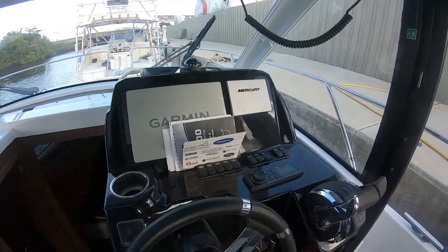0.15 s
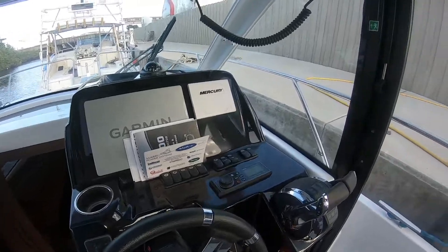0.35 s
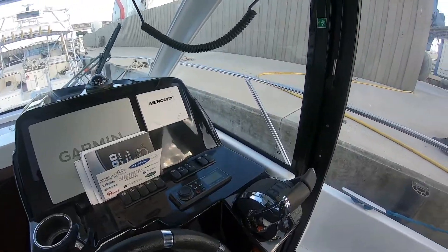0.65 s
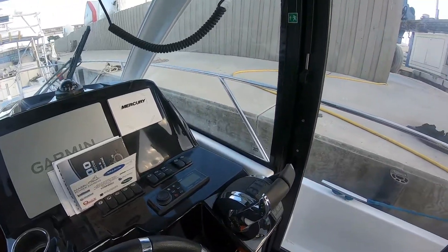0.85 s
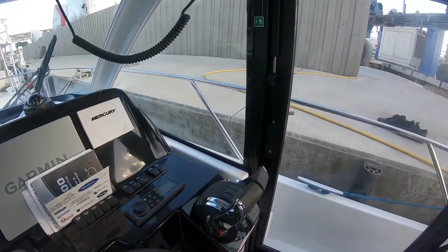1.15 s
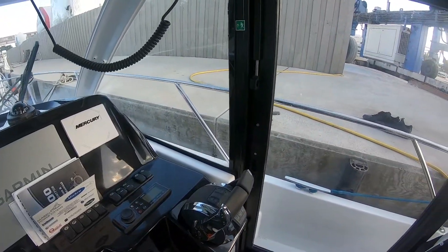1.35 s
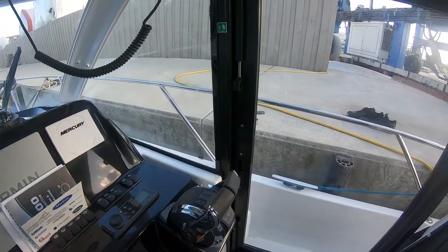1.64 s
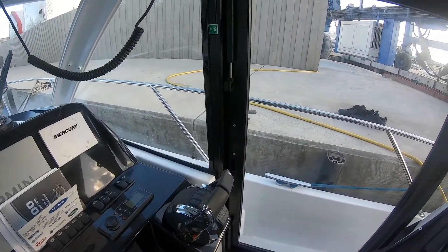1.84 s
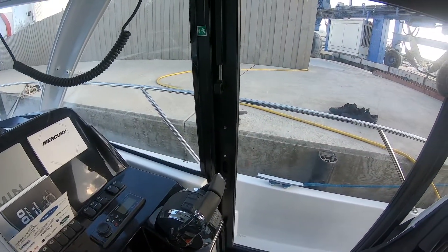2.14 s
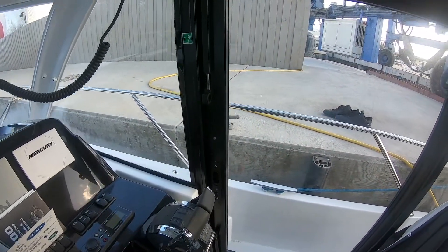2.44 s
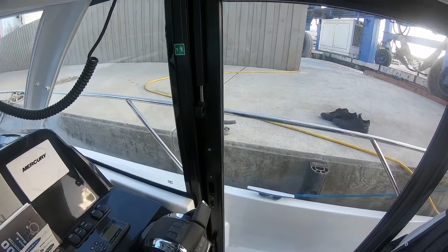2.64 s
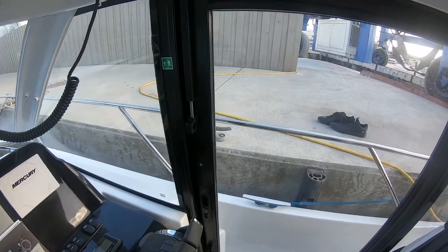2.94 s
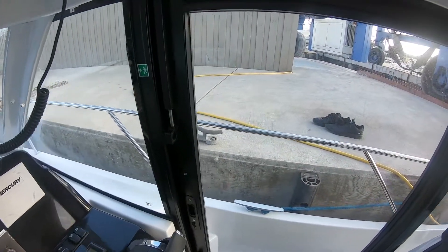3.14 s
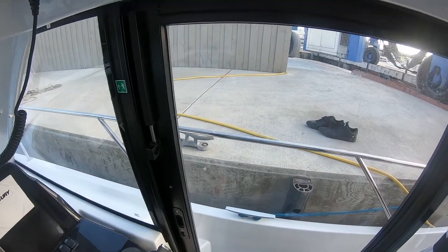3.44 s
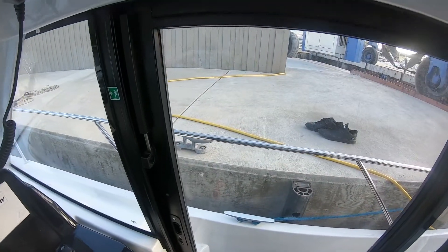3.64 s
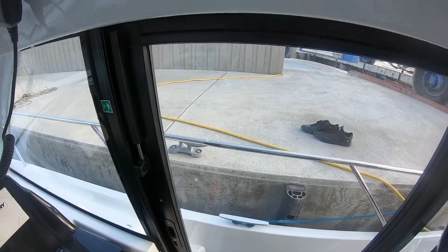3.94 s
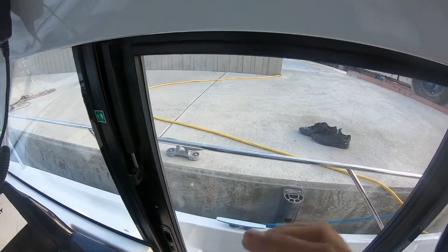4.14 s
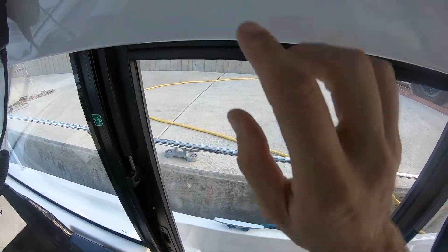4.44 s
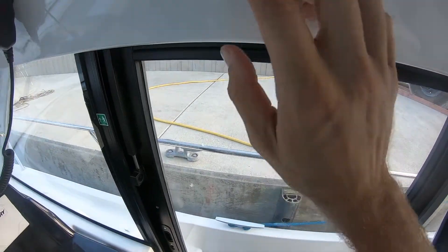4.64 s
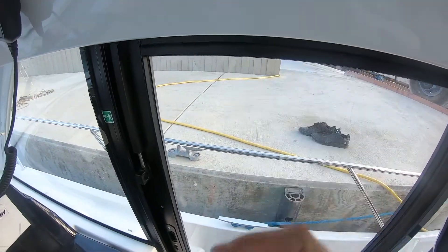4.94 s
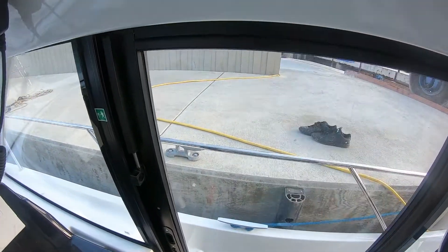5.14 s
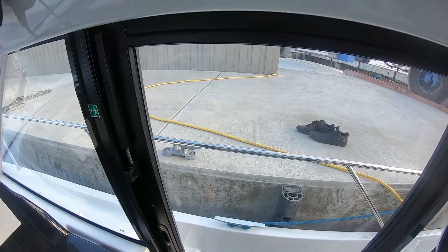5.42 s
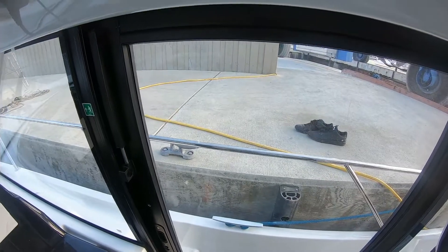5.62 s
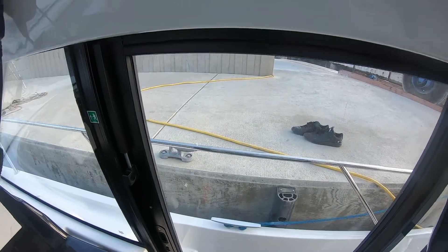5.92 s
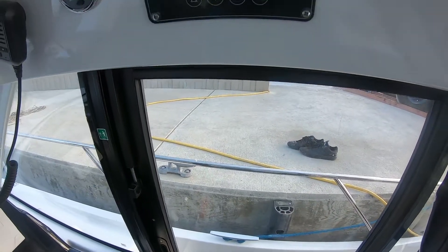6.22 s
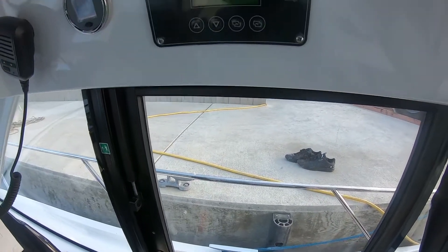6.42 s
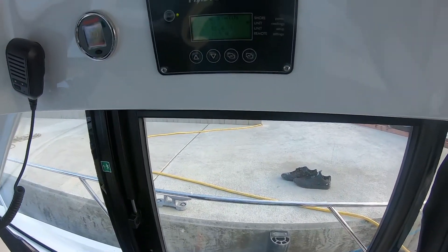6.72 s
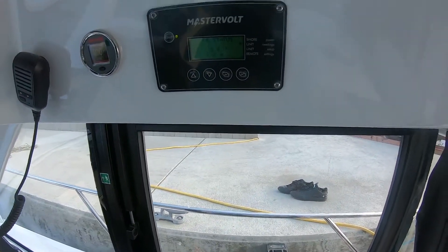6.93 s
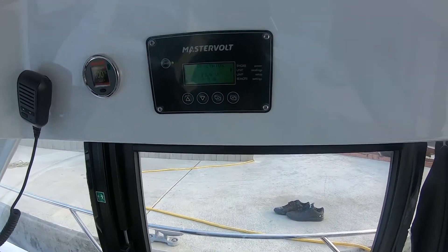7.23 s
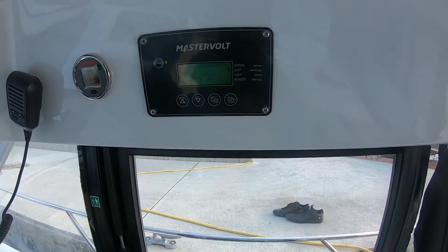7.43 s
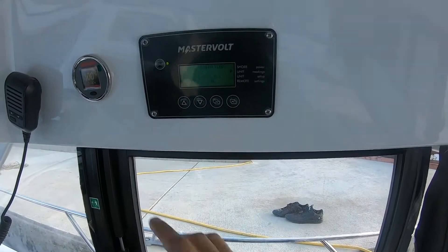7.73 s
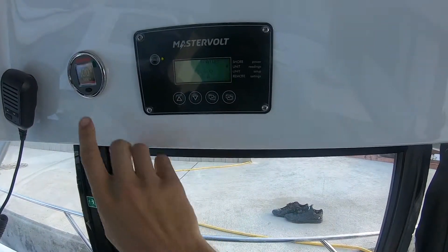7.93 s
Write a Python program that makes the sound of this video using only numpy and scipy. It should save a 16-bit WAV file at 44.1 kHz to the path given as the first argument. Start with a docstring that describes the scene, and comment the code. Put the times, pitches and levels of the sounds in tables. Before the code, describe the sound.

Air conditioners rumble and hiss steadily in a small boat cabin, with a faint compressor whine, soft hand brushes, a light knock and small plastic ticks.

```python
"""Small boat cabin, air conditioners running, one hand-held camera microphone starting close by the helm.
From the start: rumble from the ducts, hiss from the vents, blower hum, faint electrical tones, compressor whine.
The camera soon leaves the helm and the whine recedes; soft brushes of the hand, then a light knock on a panel.
It rounds to the side window and a small tick sounds; up at the ceiling the whine is strong again,
a second tick chatters and a higher pair of tones sings up twice. Noise, sines and decaying modes make it all."""
import sys
import numpy as np
from scipy import signal
from scipy.fft import rfft, irfft
from scipy.io import wavfile
from scipy.ndimage import map_coordinates

SR = 44100
rng = np.random.default_rng(int(sys.argv[2]) if len(sys.argv) > 2 else 0)


def int16_out(signal):
    """Quantize to a 16-bit WAV file."""
    q = np.round(np.clip(np.atleast_2d(signal).T, -1, 1) * 32767)
    wavfile.write(sys.argv[1], SR, q.astype(np.int16))


N = 355975
T = np.arange(N) / SR  # s

# the camera's moves (start/s, end/s): away from the helm, out into the cabin,
# round to the side window, up to the ceiling
LEAVE, STEP, TURN, LIFT = (0.35, 0.96), (2.17, 3), (2.6, 4.6), (5.9, 6.75)


def move(start, end):
    """A smooth hand movement: 0 before it starts, 1 once it is over."""
    progress = np.clip((T - start) / (end - start), 0, 1)
    return 0.5 - 0.5 * np.cos(np.pi * progress)


def bump(s, half):
    """A smooth rise and fall round a moment, 1 at its top."""
    return np.exp(-0.5 * ((T - s) / half) ** 2)


def undb(db):
    """Decibels to gain."""
    return 10 ** (np.asarray(db) / 20)


def unit(x):
    """Scale to rms 1."""
    return x / np.sqrt(np.mean(x ** 2))


def walk(rate):
    """Smooth random drift with spread 1, mostly slower than the rate in Hz."""
    bins = np.arange(N // 2 + 1) * SR / N
    return unit(irfft(rfft(rng.standard_normal(N)) / (1 + (bins / rate) ** 4), N))


def noise(colour):
    """Noise of rms 1 with a (f/Hz, level/dB) colour that falls steeply beyond its ends."""
    hz, db = np.transpose(colour)
    bins = np.arange(1, N // 2 + 2) * SR / N
    skirts = np.minimum(bins / hz[0], 1) ** 4 * np.minimum(hz[-1] / bins, 1) ** 4
    gain = undb(np.interp(np.log(bins), np.log(hz), db)) * skirts
    return unit(irfft(rfft(rng.standard_normal(N)) * gain, N))


def split(x, hz):
    """The parts of a sound below and above a frequency."""
    bins = np.arange(N // 2 + 1) * SR / N
    low = irfft(rfft(x) / (1 + (bins / hz) ** 8), N)
    return low, x - low


def tone(hz):
    """Sine of rms 1 on a moving pitch."""
    cycles = np.cumsum(hz) / SR + rng.random()
    return np.sqrt(2) * np.sin(2 * np.pi * cycles)


def steady_tones(lines, wander_hz, waver_db):
    """Machine tones that waver as the microphone passes through their standing waves."""
    total = 0
    for hz, db in lines:
        wandering = tone(hz + wander_hz * walk(rate=3.2))
        total = total + wandering * undb(db + waver_db * walk(rate=2.3))
    return total


def ring(modes, t):
    """Struck modes (f/Hz, level/dB, t60/s), t seconds after the blow."""
    return sum(undb(db - 60 * t / t60) * np.sin(2 * np.pi * hz * t) for hz, db, t60 in modes)


CABIN_T60_S, CABIN_WET_DB = 0.15, -12.5


def cabin(x, t60, wet_db, count=5):
    """Short wall reflections; their pattern changes from place to place along the camera's path."""
    t = T[:SR // 5]
    out = x
    for place in range(count):
        # the first reflection comes after 4 ms
        response = rng.standard_normal(len(t)) * undb(-60 * t / t60) * (t > 0.004)
        echoes = signal.fftconvolve(x, response / np.linalg.norm(response))[:N]
        nearness = np.maximum(1 - np.abs(np.linspace(0, count - 1, N) - place), 0)
        out = out + undb(wet_db) * np.sqrt(nearness) * echoes
    return out / np.sqrt(1 + undb(wet_db) ** 2)


# turbulence in the ducts, relative colour (f/Hz, level/dB per Hz)
DUCT_COLOUR = [(15, -18), (23, -3), (32, 0), (48, -2.5), (80, 3), (100, 2), (130, 5.5), (152, -5),
               (172, -3), (215, -7), (238, -11), (285, -10), (355, -17.5), (382, -15), (440, -24),
               (500, -26), (565, -46)]
DUCT_SPLIT_HZ = 195
DEEP_DB, DEEP_LEAVE_DB, DEEP_STEP_DB, DEEP_LIFT_DB = -40, 2.2, 0.86, -1
FULL_DB, FULL_STEP_DB = -46.5, 3


def duct_rumble():
    """Turbulent air rumbles in the ducts: large eddies below, smaller ones above."""
    deep, full = split(noise(DUCT_COLOUR), DUCT_SPLIT_HZ)
    deep_db = DEEP_DB + DEEP_LEAVE_DB * move(*LEAVE) + DEEP_STEP_DB * move(*STEP) + DEEP_LIFT_DB * move(*LIFT)
    surge_db = 1.0 * walk(rate=13)  # large eddies make the deep rumble lumpy
    churn_db = 1.02 * walk(rate=9)  # smaller eddies stir its body
    body = unit(full) * undb(FULL_DB + FULL_STEP_DB * move(*STEP) + churn_db)
    return unit(deep) * undb(deep_db + surge_db) + body


# hollow note of the vent boxes, relative colour (f/Hz, level/dB per Hz)
VENT_COLOUR = [(480, -11), (565, -18), (640, -7), (680, -7), (725, -1.5), (780, -3.5), (835, 0.7),
               (900, -5.5), (950, -7), (995, -10), (1060, -12.5), (1120, -21.5), (1190, -10), (1300, -22)]
VENT_DB, VENT_TURN_DB, VENT_LIFT_DB = -57.5, 2, -1.5


def vent_boxes():
    """Air sounds the hollow vent boxes as noise peaked at their resonances."""
    return noise(VENT_COLOUR) * undb(VENT_DB + VENT_TURN_DB * move(*TURN) + VENT_LIFT_DB * move(*LIFT))


# the nearest panel mirrors the hiss: detour at the helm and what the moves add to it (m)
DETOUR_M, DETOUR_TURN_M, DETOUR_LIFT_M = 0.17, 0.059, -0.07
# strength of that reflection at the helm, and what the moves add to it (dB)
MIRROR_DB, MIRROR_TURN_DB, MIRROR_LIFT_DB = -22, 3, 1


def mirrored(x):
    """A close panel adds a slightly later copy; the comb it makes slides as the camera moves."""
    turn, lift = move(*TURN), move(*LIFT)
    detour_m = DETOUR_M + DETOUR_TURN_M * turn + DETOUR_LIFT_M * lift
    late_samples = detour_m / 343 * SR  # speed of sound in m/s
    strength = undb(MIRROR_DB + MIRROR_TURN_DB * turn + MIRROR_LIFT_DB * lift)
    return x + strength * map_coordinates(x, [np.arange(N) - late_samples], mode="mirror")


# air on the grille slats, relative colour (f/Hz, level/dB per Hz)
GRILLE_COLOUR = [(1190, -19), (1280, -1.5), (1750, 1), (2600, -0.1), (3200, 1.16), (3800, -4.5),
                 (4250, -3.5), (4700, -4.5), (5800, -6), (6300, -4), (6700, -6), (7200, -8), (7900, -7),
                 (8350, -12.5), (9200, -14.5), (9750, -24), (10400, -19.5), (12900, -21.5)]
# narrow band of extra hiss from the slats, relative colour (f/Hz, level/dB per Hz)
SLAT_COLOUR = [(3950, -10), (4250, -4), (4550, -19.5)]
HISS_DB, HISS_TURN_DB = -51, -0.6
SHARP_DB, SHARP_TURN_DB, SHARP_LIFT_DB = -55.5, -2, -0.6
SLAT_DB, SLAT_TURN_DB, SLAT_LIFT_DB = -63.5, -0.2, -5.5


def grille_hiss():
    """Air hisses on the grille slats; the upper hiss is beamed, so it changes most on the turn."""
    turn, lift = move(*TURN), move(*LIFT)
    soft, sharp = split(noise(GRILLE_COLOUR), hz=3870)
    soft_hiss = mirrored(unit(soft)) * undb(HISS_DB + HISS_TURN_DB * turn)
    sharp_hiss = unit(sharp) * undb(SHARP_DB + SHARP_TURN_DB * turn + SHARP_LIFT_DB * lift)
    slat_db = SLAT_DB + SLAT_TURN_DB * turn + SLAT_LIFT_DB * lift + 1.5 * walk(rate=4.3)
    slats = noise(SLAT_COLOUR) * undb(slat_db)
    flutter = undb(0.38 * walk(rate=16))
    return (soft_hiss + sharp_hiss + slats) * flutter


SHAFT_HZ = 35.9
# overtones of the shaft (multiple, level/dB, level added by the lift to the ceiling/dB)
SHAFT_OVERTONES = [(2, -48.5, 1.5), (3, -48.5, -1)]
# swells of the shaft note, the microphone in a belly of its standing wave (start t/s, end t/s, level/dB)
SHAFT_SWELLS = [(0, 1.55, -46), (1.7, 2.84, -37.5), (4.55, 7.63, -40.5)]
SWELL_FADE_S = 0.57


def blower():
    """The slightly unbalanced wheel shakes the cabin at shaft rate and its multiples."""
    def fade(s):
        return move(s - SWELL_FADE_S / 2, s + SWELL_FADE_S / 2)

    swell = sum(undb(db) * (fade(start) - fade(end)) for start, end, db in SHAFT_SWELLS)
    hz = SHAFT_HZ * (1 + 0.0035 * walk(rate=1.38))
    out = tone(hz) * swell
    for multiple, db, lift_db in SHAFT_OVERTONES:
        overtone_db = db + lift_db * move(*LIFT) + 2.0 * walk(rate=0.54)
        out = out + tone(multiple * hz) * undb(overtone_db)
    return out


# steady hum of motors, pump and panels (f/Hz, level at the helm/dB,
# level added by the step into the cabin/dB, level added by the lift to the ceiling/dB)
HUM_TONES = [(56.8, -53, 1.5, -2), (121.5, -53, -12.5, -10), (161.6, -54.5, 3, 5), (216.5, -55, 1, -3),
             (254, -70.5, 11.5, 5), (295.2, -68, 9.5, 4), (335.6, -65, -4, -5)]


def machine_hum():
    """Motors, pump and panels hum at fixed pitches, each rebalanced by the step and the lift."""
    step, lift = move(*STEP), move(*LIFT)
    lines = [(hz, db + step_db * step + lift_db * lift) for hz, db, step_db, lift_db in HUM_TONES]
    return steady_tones(lines, wander_hz=0.31, waver_db=2.5)


# thin electrical tones (f/Hz, level/dB)
ELECTRICAL_TONES = [(7000, -84), (13244, -82), (13530, -89.5), (13817, -83)]


def electrical_tones():
    """Electrical parts sing as faint, high, wavering sines."""
    return steady_tones(ELECTRICAL_TONES, wander_hz=1.4, waver_db=2.0)


# the compressor slows slightly under load
WHINE_HZ, WHINE_SAG_HZ_PER_S = 1348, 0.37
WHINE_DB, WHINE_LEAVE_DB, WHINE_TURN_DB, WHINE_LIFT_DB = -59.5, -8.5, -2.5, 11
# the whine dips briefly (t/s, level change/dB)
DIPS = [(.43, -4), (6.73, -6), (7.44, -1), (8.04, -3)]
WHINE_DIP_S = 0.031  # half-length
# a higher pair of tones sings up briefly (t/s, half-length/s, level/dB)
SING_SWELLS = [(7.134, .045, -58.5), (7.39, .05, -59.5)]
# that pair (f/Hz, relative level/dB)
SING_PAIR = [(1825, 0.5), (1898, -8)]


def compressor():
    """A whine trembling with the load, clearest at helm and ceiling, where higher tones join briefly."""
    hz = WHINE_HZ - WHINE_SAG_HZ_PER_S * T
    db = WHINE_DB + WHINE_LEAVE_DB * move(*LEAVE) + WHINE_TURN_DB * move(*TURN) + WHINE_LIFT_DB * move(*LIFT)
    db = db + sum(dip_db * bump(s, WHINE_DIP_S) for s, dip_db in DIPS)
    whine = tone(hz + 1.0 * walk(rate=3.9)) * undb(db + 0.68 * walk(rate=10))
    swell = sum(undb(top_db) * bump(s, half) for s, half, top_db in SING_SWELLS)
    return whine + steady_tones(SING_PAIR, wander_hz=2, waver_db=0.5) * swell


# brushes of the hand (t/s, half-length/s, level/dB, extra treble/dB)
HAND_BRUSHES = [(0.291, .06, -58.5, 7), (1.33, .12, -70, 12), (2.03, .09, -68, 11), (3.039, 0.005, -44, -1),
                (3.053, 0.009, -44.5, -1), (3.102, 0.057, -56.5, 1), (3.55, 0.33, -71, 16),
                (3.81, 0.054, -63, 7), (5.7, .06, -56, -12)]
# their relative colour (f/Hz, level/dB per Hz)
BRUSH_COLOUR = [(1200, -15), (1500, 5), (1800, 12.5), (2150, 1.5), (2800, 8.5), (4200, 1), (7500, -2),
                (10000, -11.5), (13000, -14), (16000, -22)]
BRUSH_SPLIT_HZ = 7500


def hand_brushes():
    """Skin brushes the camera, right at the microphone: grainy noise in short swishes."""
    grain = undb(1.7 * walk(rate=210))
    dull, bright = split(noise(BRUSH_COLOUR) * grain, BRUSH_SPLIT_HZ)
    swishes = 0
    for s, half, db, treble_db in HAND_BRUSHES:
        swishes = swishes + (dull + undb(treble_db) * bright) * undb(db) * bump(s, half)
    return swishes


# one soft knock on a hollow panel
KNOCK_S, KNOCK_DB = 3.2, -43
# the panel's modes (f/Hz, relative level/dB, t60/s)
PANEL_MODES = [(735, -1, 0.065), (850, -7, .04)]


def panel_knock():
    """A soft blow rings the hollow panel's decaying modes."""
    return undb(KNOCK_DB) * ring(PANEL_MODES, np.maximum(T - KNOCK_S, 0))


# small ticks and their rebounds (t/s, ring level/dB, snap level/dB, pitch ratio of the ring)
TICK_HITS = [(5.6122, -37.5, -46, 1), (5.6145, -47, -45.5, 1.4), (5.6195, -40, -60, 1),
             (5.6305, -43, -60, 1.15), (7.2605, -41, -62, 1.08), (7.2648, -30.5, -46.5, 1),
             (7.2662, -33, -49, 1.27), (7.2828, -43, -60, 1)]
# hard plastic that they ring, at pitch ratio 1 (f/Hz, relative level/dB, t60/s)
PLASTIC_MODES = [(2980, 0.5, 0.017), (3350, -15, .009), (4000, -3, 0.0089)]
# dry snap of the ticks, relative colour (f/Hz, level/dB per Hz)
SNAP_COLOUR = [(1600, -16), (2300, -5), (2900, -1), (3900, 8), (5400, -5), (7500, 1), (9300, -2),
               (11000, -18)]
SNAP_S = 0.0024  # decay time constant


def plastic_ticks():
    """Small ticks snap and chatter on hard plastic: a noise burst over a short modal ring."""
    snap = noise(SNAP_COLOUR)
    hits = 0
    for s, ring_db, snap_db, pitch in TICK_HITS:
        t = np.maximum(T - s, 0)
        burst = undb(snap_db) * snap * np.exp(-t / SNAP_S)
        # a higher pitch ratio also shortens the ring
        plastic = undb(ring_db) * ring(PLASTIC_MODES, pitch * t)
        onset = 1 - np.exp(-t / 0.0004)
        hits = hits + (burst + plastic) * onset
    return hits


def scene():
    """All sources at the one microphone; vents, knock and ticks also reflect off the cabin walls."""
    air = duct_rumble() + cabin(vent_boxes() + grille_hiss(), CABIN_T60_S, CABIN_WET_DB)
    machines = blower() + machine_hum() + electrical_tones() + compressor()
    handling = hand_brushes() + cabin(panel_knock() + plastic_ticks(), CABIN_T60_S, wet_db=-9)
    return (air + machines + handling)[None]


TOP_HZ = 15600


def record(dry):
    """The camera's microphone dulls the highest treble, and the top is cut."""
    dull = signal.sosfilt(signal.butter(7, 13400, fs=SR, output="sos"), dry)
    return signal.sosfilt(signal.ellip(10, 0.2, 80, TOP_HZ, fs=SR, output="sos"), dull)


dry = scene()
out = record(dry)
int16_out(out)
```